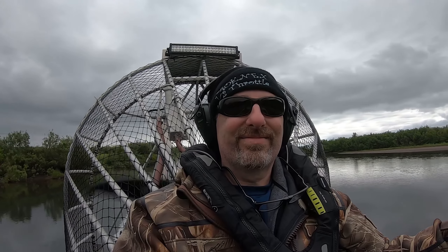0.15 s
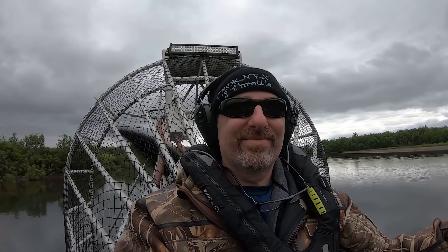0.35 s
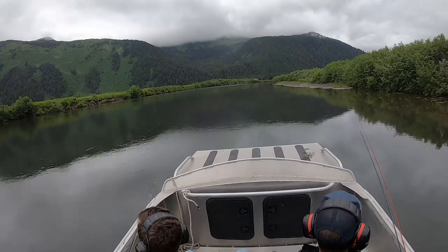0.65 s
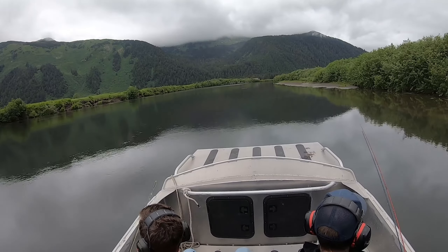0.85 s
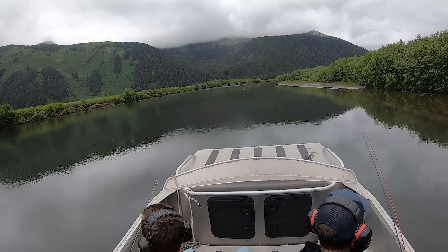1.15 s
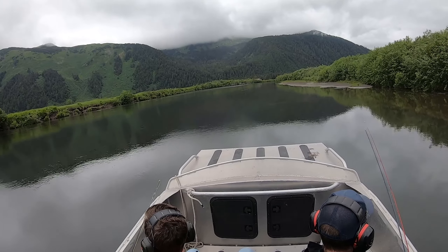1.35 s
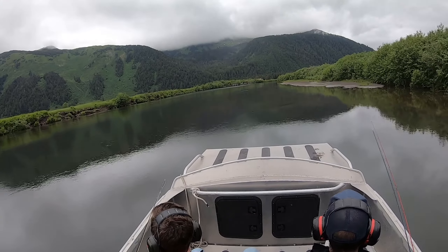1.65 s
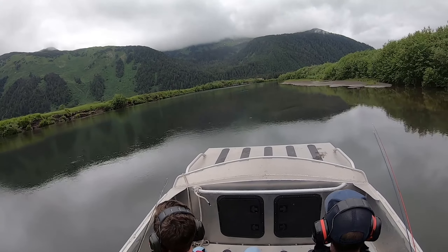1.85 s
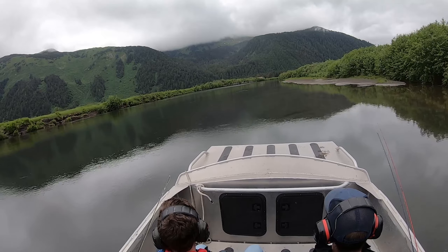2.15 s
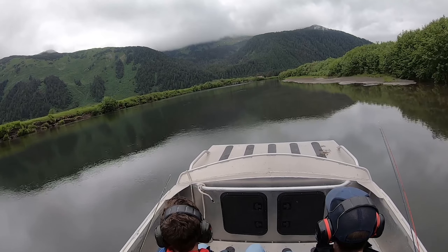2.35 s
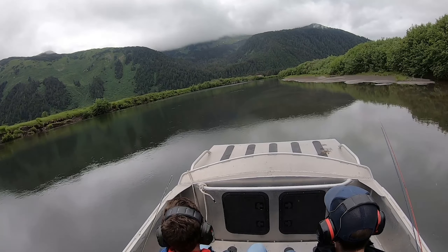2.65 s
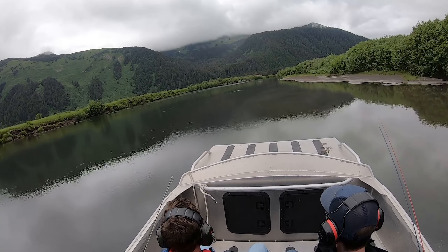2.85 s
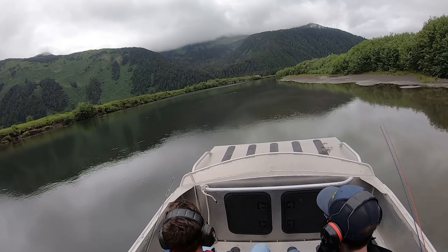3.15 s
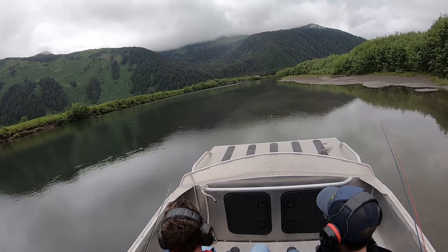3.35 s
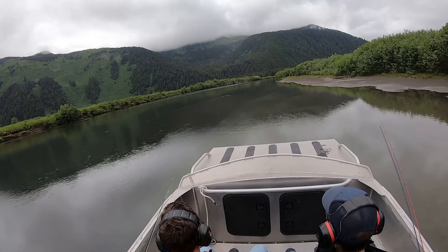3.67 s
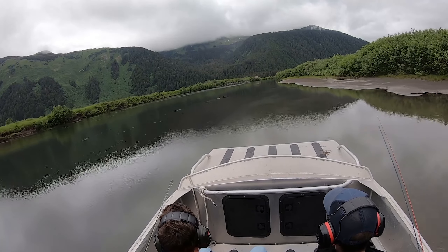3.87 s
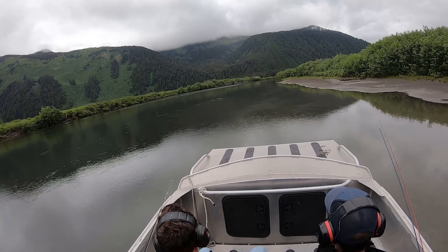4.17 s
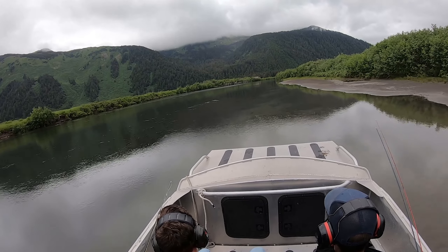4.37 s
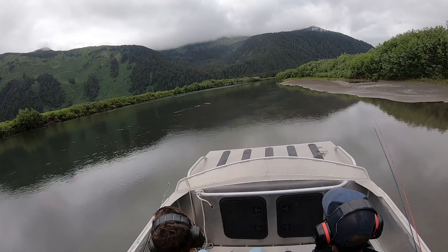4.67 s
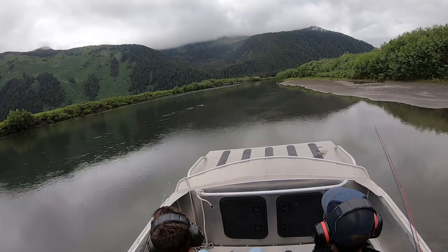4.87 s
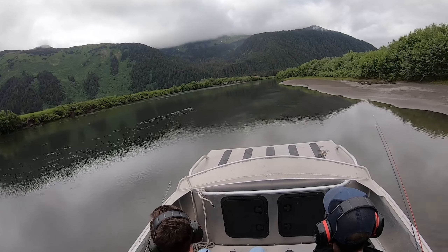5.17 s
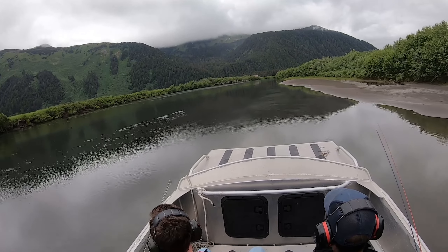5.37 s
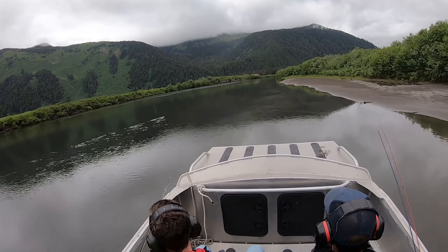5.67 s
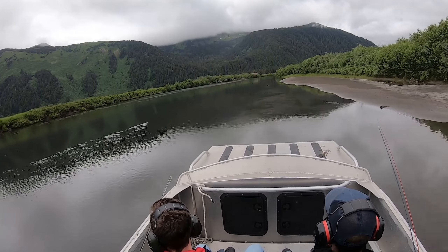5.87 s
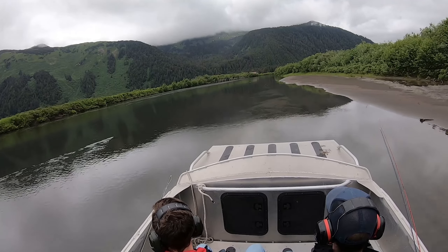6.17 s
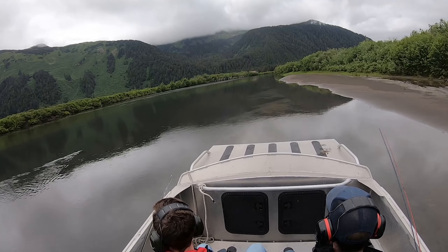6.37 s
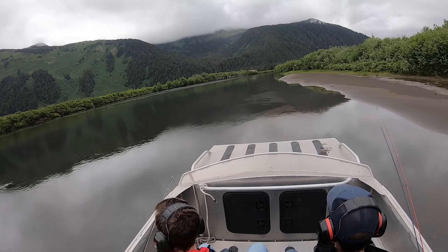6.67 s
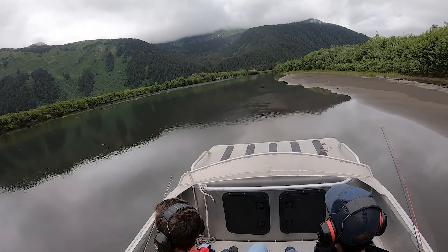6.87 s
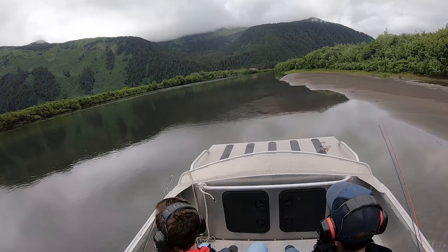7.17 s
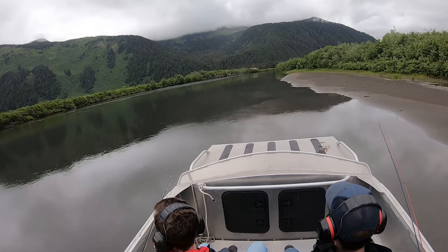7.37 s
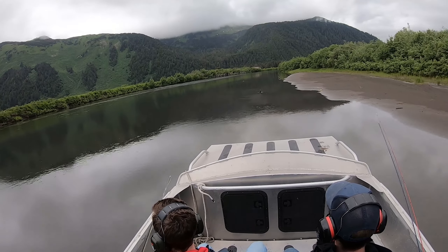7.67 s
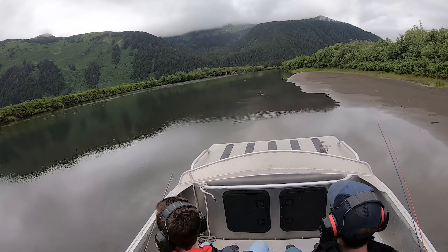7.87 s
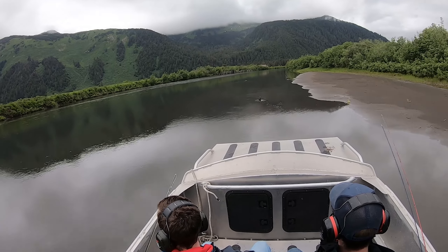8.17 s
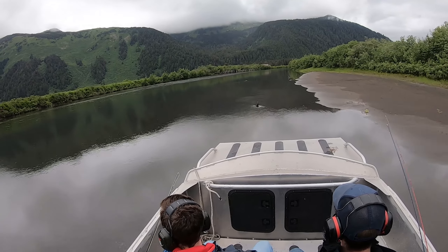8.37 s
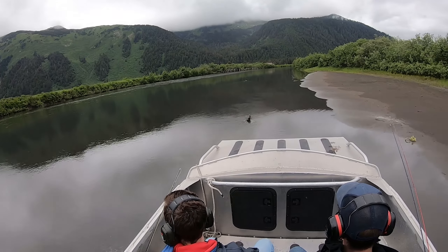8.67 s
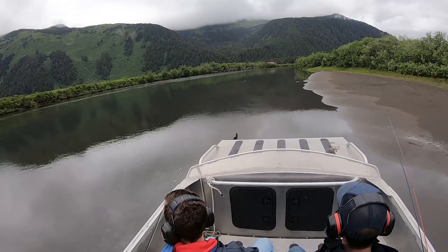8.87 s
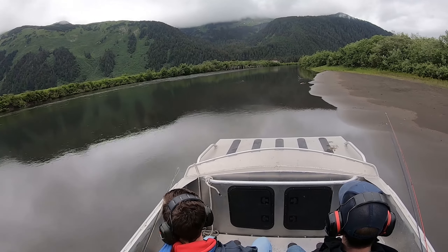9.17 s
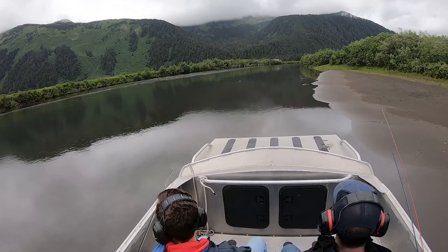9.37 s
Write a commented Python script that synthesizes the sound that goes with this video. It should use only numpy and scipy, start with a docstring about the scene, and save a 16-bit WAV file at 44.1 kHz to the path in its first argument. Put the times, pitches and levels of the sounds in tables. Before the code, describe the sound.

Heard on board an airboat on an open river: a loud V8 and three-blade propeller hold a steady, low buzzing drone. Slipstream roar and a softer blade hiss surround it, with a thin belt whine coming and going. At about 0.7 seconds the sound jumps abruptly with a sharp click, then continues unchanged to the end. The close microphone evens out the loud beats.

```python
"""Airboat at steady throttle, heard on board

A V8 turns a three-blade propeller through a 48:110 toothed belt. Blade tones, exhaust orders and belt whine
are drifting sine tones locked to one shaft. The slipstream's roar and the blades' hiss are shaped noise.
Early on the sound skips: all tones leap ahead, with a click. Fast gain control evens out the loud beats."""
import sys
import numpy as np
from scipy import signal
from scipy.fft import rfft, irfft, next_fast_len
from scipy.io import wavfile
from scipy.ndimage import uniform_filter1d, map_coordinates

SR = 44100
rng = np.random.default_rng(int(sys.argv[2]) if len(sys.argv) > 2 else 0)


def store_wav(level_fs):
    """Save 16-bit WAV to argv[1]."""
    pcm = np.round(np.clip(np.atleast_2d(level_fs), -1, 1) * 32767)
    wavfile.write(sys.argv[1], SR, pcm.T.astype(np.int16))


N = 419832  # length in samples
BLADES, BELT_TEETH, FIRINGS = 3, 110, 8  # per propeller turn, per propeller turn, per engine cycle
CYCLES_PER_TURN = 110 / 96  # the belt gives 110/48 crank turns; a four-stroke cycle takes two
SKIP_AT_S, SKIP_TURNS = .702, 3.097  # moment the sound skips, propeller turns left out


def amp(db):
    """Gain of a dB value."""
    return np.exp(np.log(10) / 20 * np.asarray(db))


def unit(x):
    """Scale to rms 1."""
    return x / np.sqrt(np.mean(np.abs(x) ** 2) + 1e-20)


def curves(rows):
    """Draw each column after the time as a curve with one value per sample."""
    seconds, *columns = np.transpose(rows)
    return [np.interp(np.arange(N) / SR, seconds, column) for column in columns]


def wobble(rate):
    """A smooth random curve around zero, through `rate` random knots a second."""
    coarse = np.arange(0, N + 64, 64)
    knots = rng.standard_normal(int(N * rate / SR) + 4)
    smooth = map_coordinates(knots, [coarse * rate / SR])
    return np.interp(np.arange(N), coarse, smooth)


def filtered(x, response):
    """Filter x by a gain given as a function of frequency in Hz."""
    size = next_fast_len(N + 8192)
    spectrum = rfft(x, size) * response(np.fft.rfftfreq(size, 1 / SR))
    return irfft(spectrum, size)[..., :N]


def rush(spectrum, patchy_db):
    """Coloured noise of rms 1, made uneven by patches of random gain in time and frequency."""
    cells = signal.stft(rng.standard_normal(N), nperseg=512)[2]
    across_hz = uniform_filter1d(rng.standard_normal(cells.shape), size=8, axis=0)
    patches = unit(uniform_filter1d(across_hz, size=12, axis=1))
    noise = signal.istft(cells * amp(patchy_db * patches), nperseg=512)[1][:N]
    f, db = np.transpose(spectrum)

    def colour(hz):
        return amp(np.interp(np.log(hz + 1), np.log(f + 1), db, right=-120))

    return unit(filtered(noise, colour))


def tone(cycles, wander, rate):
    """A tone of rms 1 whose strength and phase drift by a random share, `rate` knots a second."""
    phase = (2 * np.pi * (cycles % 1)).astype(np.float32)
    in_phase = (1 + wander * wobble(rate)) * np.cos(phase)
    quadrature = wander * wobble(rate) * np.sin(phase)
    return unit(in_phase - quadrature)


# Shaft speed. Each row: time in seconds, propeller turns per second.
SHAFT_SPEED = [(0.0, 25.68), (1.2, 25.626), (1.7, 25.601), (2.2, 25.561), (2.7, 25.531), (3.2, 25.555),
               (3.7, 25.542), (4.2, 25.562), (4.7, 25.635), (5.2, 25.671), (5.7, 25.643), (6.2, 25.612),
               (6.7, 25.598), (7.2, 25.587), (7.7, 25.638), (8.2, 25.677), (8.7, 25.652), (9.2, 25.628)]


def shaft():
    """Propeller turns heard so far: speed summed over time, plus the turns left out where the sound skips."""
    skipped = np.arange(N) / SR > SKIP_AT_S
    return np.cumsum(curves(SHAFT_SPEED)[0]) / SR + SKIP_TURNS * skipped


# Blade-passing tones. Each row: multiple of the blade rate, level in dB rms before swell and drift,
# share of wander from turbulent inflow, dB gained per dB of the swell.
BLADE_TONES = [(1, -23, 0.1, -0.15), (2, -17.5, .08, -0.02), (3, -20.5, 0.23, 1.13), (4, -27, 0.43, .15),
               (5, -31, 0.35, -1.03), (6, -31, 0.44, 0.65), (7, -31, .6, -0.05), (8, -30, 0.49, 0.03),
               (9, -34.5, .7, -0.26), (10, -30.5, 0.4, 0.63), (11, -37.5, 0.95, -0.34),
               (12, -46, 0.4, -0.7), (13, -43, 2.2, -0.5), (14, -43, 1.2, 0.9), (15, -47, 0.73, 0.2),
               (16, -50, 0.39, 0.1), (17, -52, 1.1, 0), (18, -52.5, 1.1, -1.3), (19, -50, 3, 0.5),
               (20, -54.5, 1.3, -0.5)]
# Slow swell that shifts strength between the blade tones. Each row: time in seconds, swell in dB
# before each tone's own share.
BLADE_SWELL = [(0, 0.5), (.55, -.5), (.75, -8), (1.3, -8.5), (1.6, -1.5), (2.2, 1.5), (2.42, -3.5),
               (2.8, 1), (3.7, 2.5), (4.4, -0.5), (4.95, -6.5), (5.3, .5), (5.5, -7), (5.9, 3), (6.5, 0.5),
               (7.65, 3.5), (8.2, -6), (8.7, 5), (9.52, -3)]
DRIFTING = range(4, 11)  # the middle tones, each drifting in level on its own
DRIFT_DB, DRIFT_PER_S = 1.65, 3.5  # multiplies the random curve, knots per second


def propeller(turns):
    """Each passing blade makes one pressure pulse, smeared in time; higher tones wander faster."""
    swell_db, = curves(BLADE_SWELL)
    out = np.zeros(N)
    for k, db, wander, follows in BLADE_TONES:
        # phase offset in cycles: curves steeply over the low tones, more gently over the higher ones
        smear = min(.18 * (k - 1.9) ** 2, .72 + .03 * (k - 4) ** 2)
        drift_db = DRIFT_DB * wobble(DRIFT_PER_S) if k in DRIFTING else 0
        level = amp(db + follows * swell_db + drift_db)
        out += level * tone(k * BLADES * turns + smear, wander, 9 + 1.1 * k)
    return out


# Exhaust orders, 8 being the firing rate. Each row: multiple of the engine cycle, level in dB rms.
EXHAUST_ORDERS = [(2, -43.5), (4, -48.5), (5, -24.5), (6, -39), (7, -34), (8, -29), (10, -37.5),
                  (12, -43.5), (14, -38), (16, -43.5)]
# Thin tones of crank-driven accessories. Each row: multiple of the engine cycle, level in dB rms.
ACCESSORY_TONES = [(51, -50.5), (91, -67), (108, -61), (120, -59.5)]
CHOP_DB = -31.5  # rms level of the sideband one propeller turn above the firing tone


def engine(turns):
    """Uneven firing of two banks fills the orders under the firing rate; the fifth beats with blade tone two."""
    cycle = CYCLES_PER_TURN * turns - .012
    exhaust = sum(amp(db) * tone(k * cycle, .08, 4) for k, db in EXHAUST_ORDERS)
    accessories = sum(amp(db) * tone(k * cycle, .42, 15) for k, db in ACCESSORY_TONES)
    # beating against the firing tone, this chops it once per propeller turn
    chop = amp(CHOP_DB) * tone(FIRINGS * cycle + turns, .46, 10)
    return exhaust + accessories + chop


# Belt whine. Each row: time in seconds, level of the tooth tone in dB rms before flutter.
BELT_WHINE = [(0, -55), (.6, -56), (.75, -54), (1.15, -47.5), (1.35, -46), (1.95, -43.5), (2.3, -46.5),
              (2.5, -54.5), (3.2, -55), (3.55, -66), (4.2, -53.5), (5.0, -52), (5.55, -44), (5.8, -49.5),
              (6.5, -57), (6.9, -64), (7.3, -52.5), (8.0, -51), (9.0, -51), (9.52, -55.5)]
OCTAVE_DB, OCTAVE_FOLLOWS = -65.5, .1  # mean level before flutter, share of the tooth tone's swell
FLUTTER_DB = 1.4  # multiplies the quick random curves


def belt(turns):
    """The teeth mesh with a thin, slightly fuzzy whine and its octave."""
    tone_db, = curves(BELT_WHINE)
    swell_db = tone_db - tone_db.mean()
    octave_db = OCTAVE_DB + OCTAVE_FOLLOWS * swell_db + FLUTTER_DB * wobble(9)
    mesh = BELT_TEETH * turns
    fuzz = .16, 30  # wander share, knots per second
    whine = amp(tone_db + FLUTTER_DB * wobble(7)) * tone(mesh, *fuzz)
    return whine + amp(octave_db) * tone(2 * mesh, *fuzz)


# Colour of the slipstream roar. Each row: frequency in Hz, relative density in dB per Hz.
ROAR_COLOUR = [(12, -47.5), (22, -17.5), (55, -5.5), (105, -9.5), (170, -3.5), (195, -5), (335, -5),
               (370, -8), (650, -11), (800, -13), (950, -17.5), (1500, -34), (2000, -60), (3300, -120)]
# Colour of the blade-edge hiss. Each row: frequency in Hz, relative density in dB per Hz.
HISS_COLOUR = [(590, -32), (1000, -3), (1300, -8.5), (1500, -7), (1600, -9), (1780, -9.5), (2340, -14),
               (2880, -13), (3010, -15), (4830, -23.5), (6660, -33.5), (8200, -31), (12800, -43.5),
               (15600, -54.5)]
# Hiss level with its brief dips. Each row: time in seconds, level in dB rms before the gusts.
HISS_LEVEL = [(0, -32.5), (.5, -33.5), (.85, -34.5), (1.5, -33.5), (2.05, -35.5), (2.3, -33.5), (2.48, -38),
              (2.65, -33.5), (3.55, -35), (4.3, -35), (5.25, -32.5), (5.35, -36.5), (5.47, -33.5),
              (5.9, -35), (6.2, -34), (6.78, -35), (6.9, -36), (7.0, -34), (7.6, -35), (9.0, -34),
              (9.52, -34.5)]
ROAR_DB = -20.5  # rms level before its slow wobble
GUST_DB, GUSTS_PER_S = .75, 20  # short gusts in the hiss: multiplies the random curve, knots per second


def air(turns):
    """Turbulent roar of the slipstream, and edge hiss that pulses as each blade passes."""
    passing = 2 * np.pi * BLADES * turns
    roar_level = amp(ROAR_DB + .35 * wobble(3.014))
    roar = roar_level * unit(rush(ROAR_COLOUR, patchy_db=-1.0) * (1 + .043 * np.cos(passing)))
    pulse = 1 + .09 * np.cos(passing) + .05 * np.cos(2 * passing)
    hiss_level = amp(curves(HISS_LEVEL)[0] + GUST_DB * wobble(GUSTS_PER_S))
    hiss = hiss_level * unit(rush(HISS_COLOUR, patchy_db=.5) * pulse)
    return roar + hiss


CLICK_DB = -10.5  # peak on either side of the step, before the gain control


def click(drone):
    """At the skip the waveform dips, steps up at once and settles back into the drone: a sharp click."""
    t = np.arange(N) / SR - SKIP_AT_S
    step = amp(CLICK_DB) * np.where(t > 0, 1, -1)
    return (step - drone) * np.exp(-np.abs(t) / .0006)  # time constant in seconds


def scene():
    """All sources at one microphone, with the click where the sound skips."""
    turns = shaft()
    drone = propeller(turns) + engine(turns) + belt(turns) + air(turns)
    return (drone + click(drone))[None]


TOP_HZ = 16680  # steep band limit


def record(dry):
    """Fast gain control ducks everything under loud beats, peaks are rounded off; soft ends; band limit."""
    power = np.abs(uniform_filter1d(uniform_filter1d(dry ** 2, size=900), size=900))
    even = dry * (power / np.mean(power) + .01) ** -.24
    soft = even / (1 + np.abs(even / .64) ** 6) ** (1 / 6)
    edge = np.minimum(np.arange(N), np.arange(N)[::-1]) / (.003 * SR)  # 3 ms fades
    fade = np.sin(np.pi / 2 * np.minimum(edge, 1)) ** 2
    return filtered(soft * fade, lambda hz: hz < TOP_HZ)


dry = scene()
out = record(dry)
store_wav(out)
```